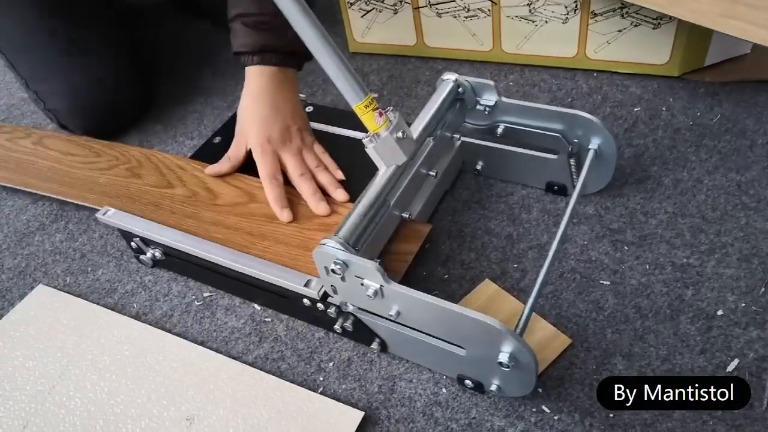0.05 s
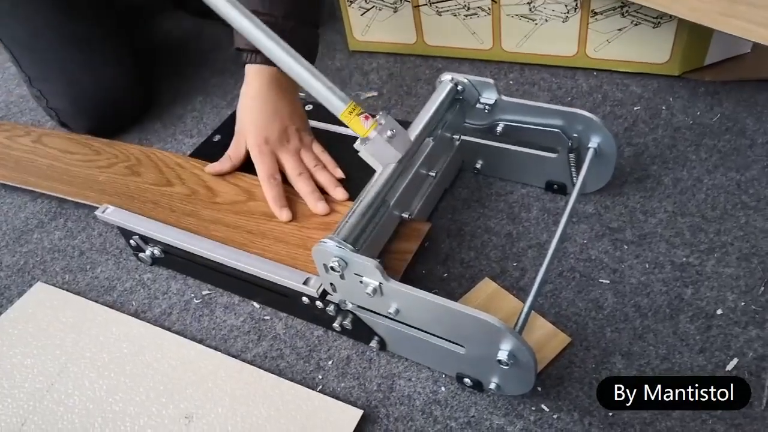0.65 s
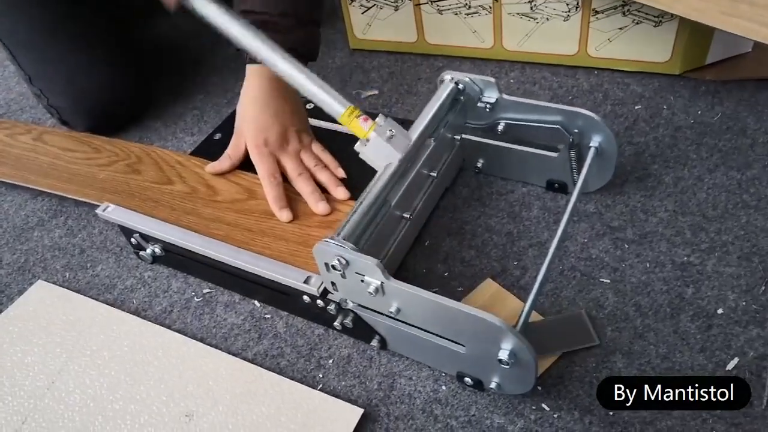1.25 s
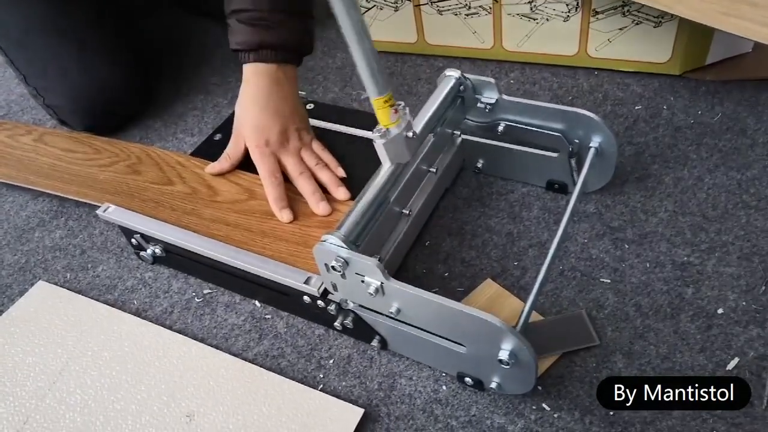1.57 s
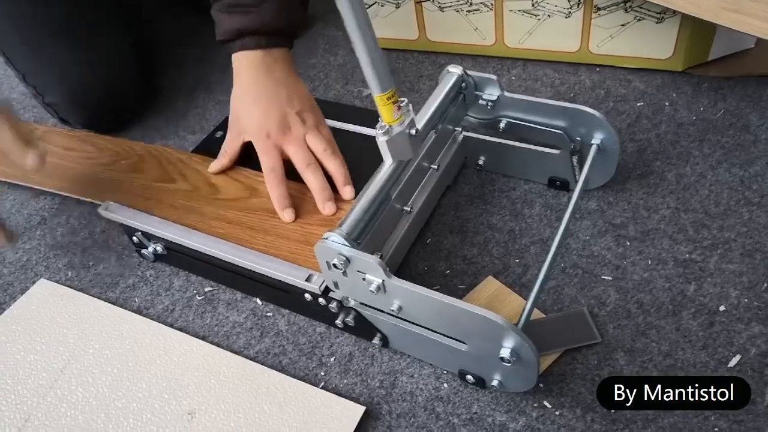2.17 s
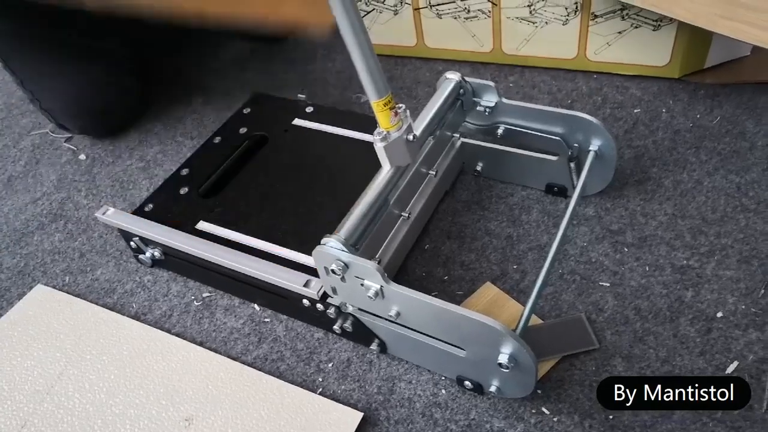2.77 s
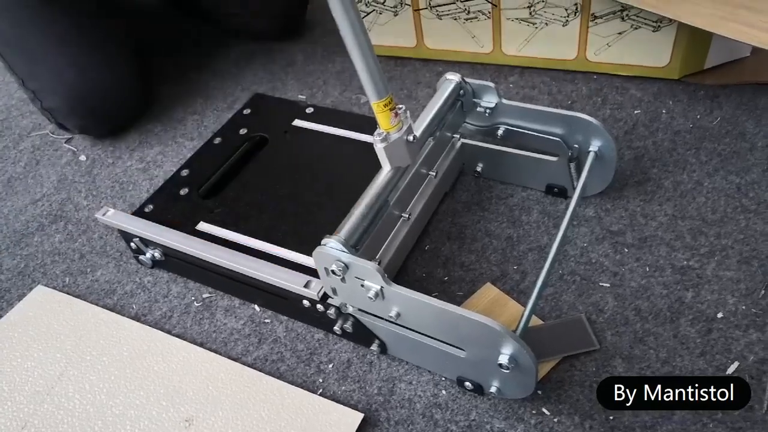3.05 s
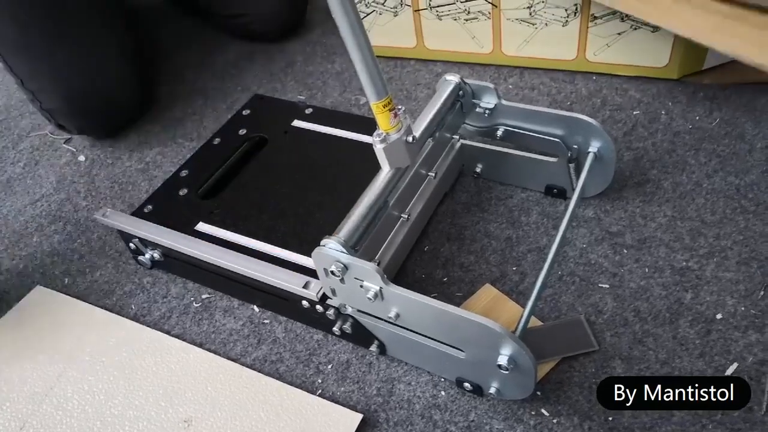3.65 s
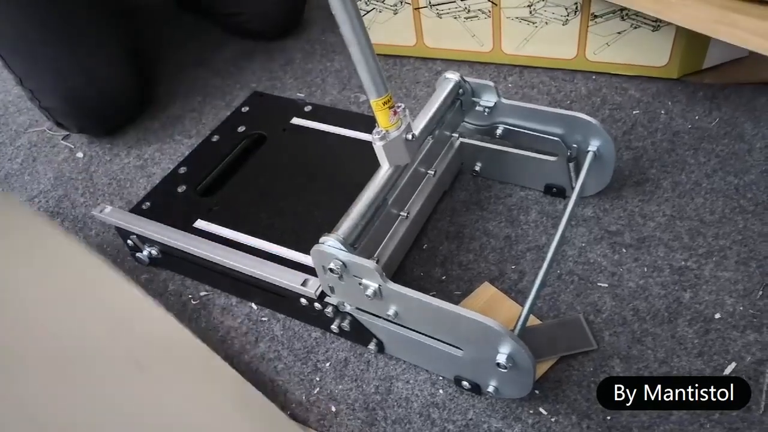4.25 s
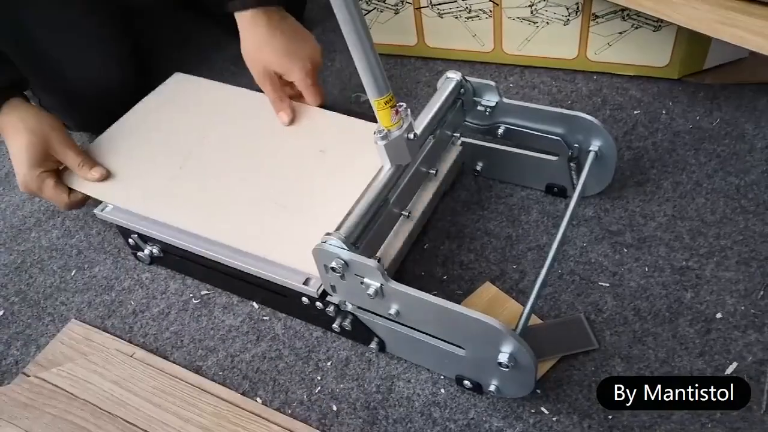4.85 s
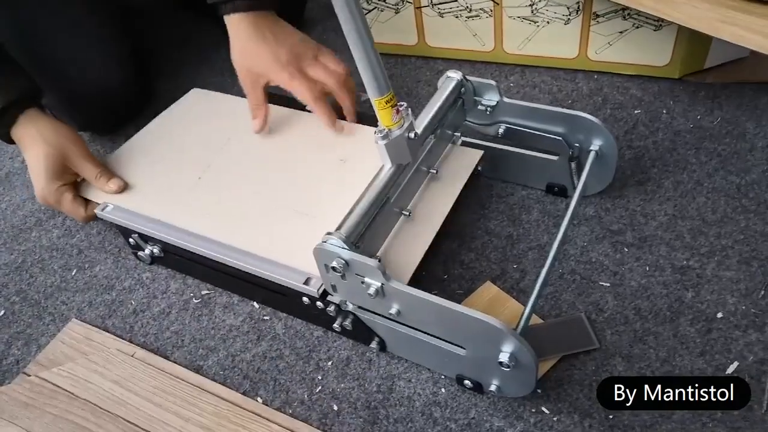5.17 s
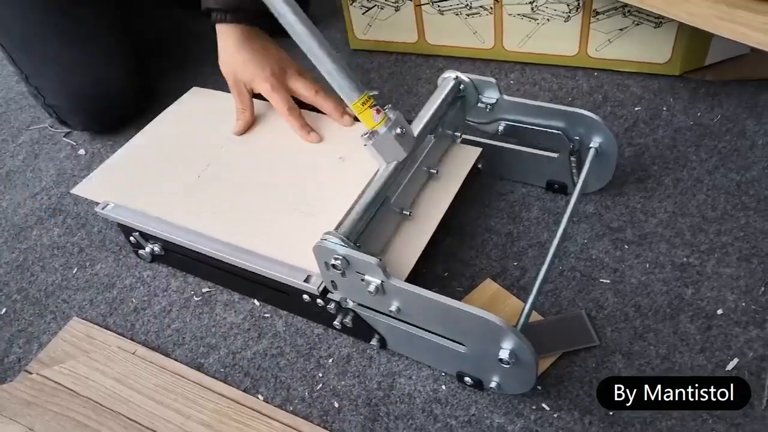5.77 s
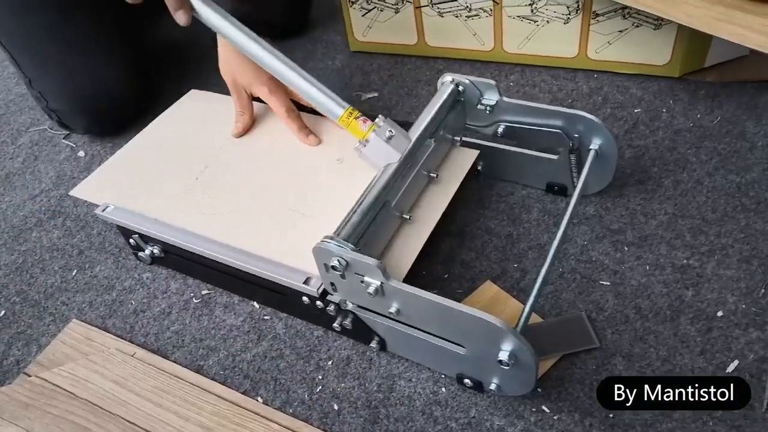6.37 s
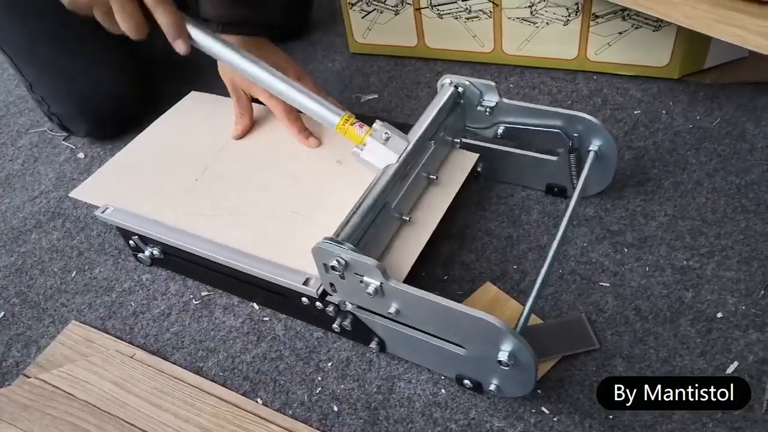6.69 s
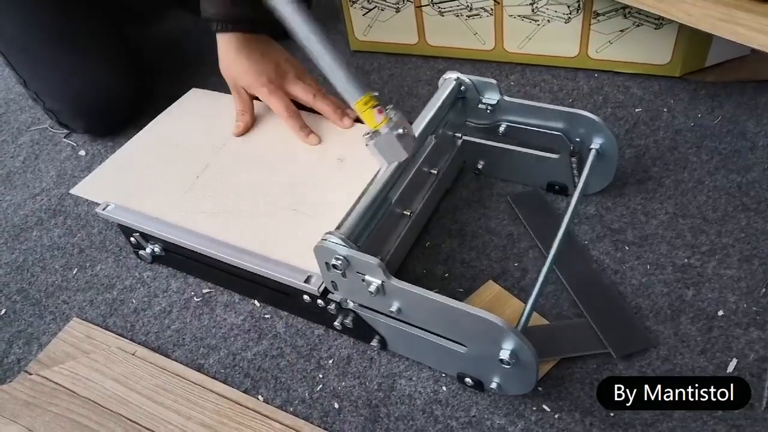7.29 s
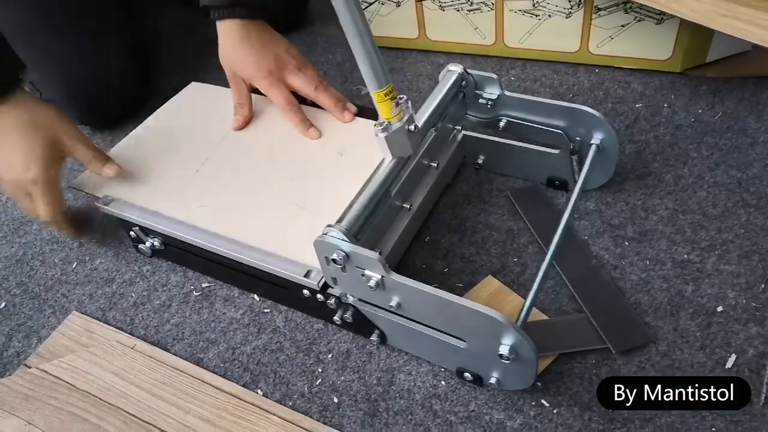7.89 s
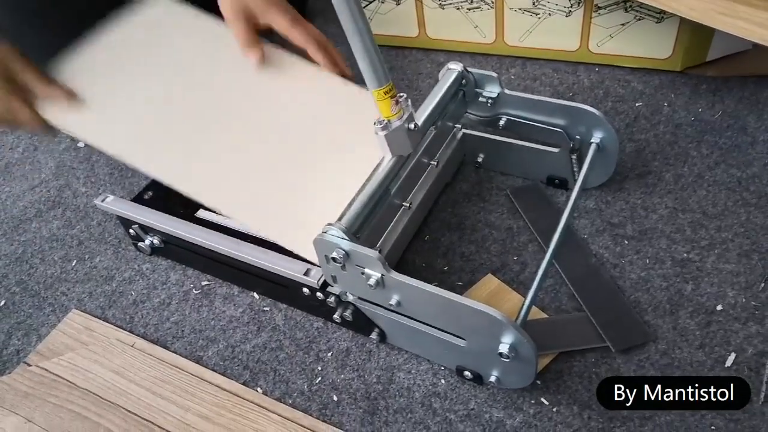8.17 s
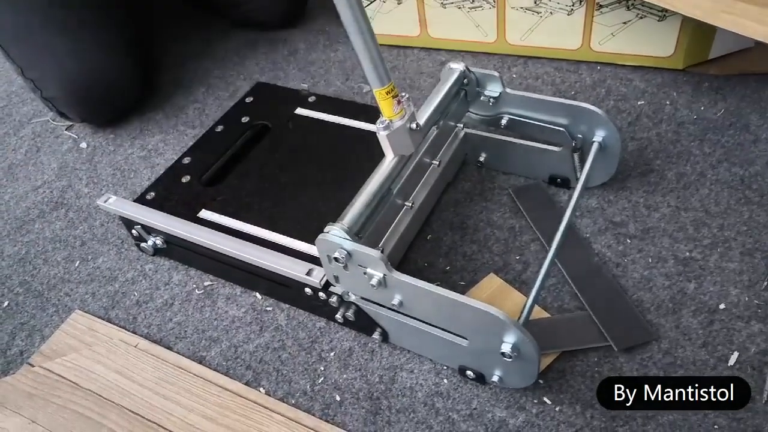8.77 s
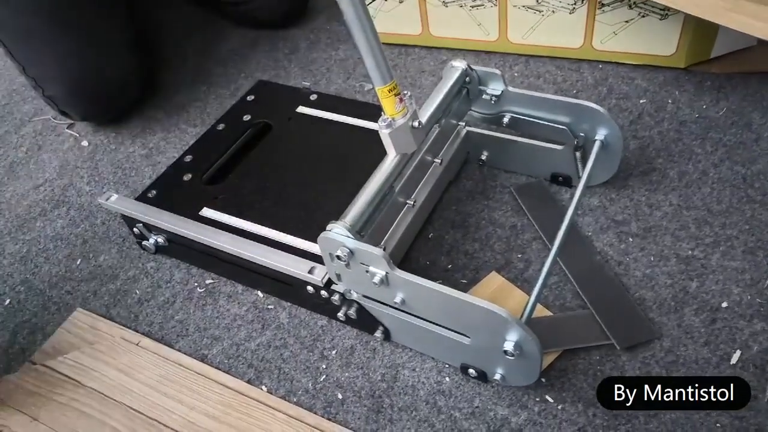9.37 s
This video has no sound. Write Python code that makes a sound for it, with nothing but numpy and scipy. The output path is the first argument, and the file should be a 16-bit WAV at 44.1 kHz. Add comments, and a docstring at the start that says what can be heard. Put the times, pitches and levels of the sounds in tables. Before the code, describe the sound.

A lever cutter shears two vinyl flooring planks with sharp snaps, scrapes and steel clanks, and each plank flops onto a pile.

```python
"""A lever cutter on a carpeted floor shears two vinyl planks in a bare, echoing room.
Each plank snaps under the blade, which scrapes the cut edge; the lever clanks against its
steel stop, rings the frame and squeaks as it rises. Cut planks flop on to a pile to the left,
and the next is knocked against the guide fence. Sleeves rustle over a low background rumble."""
import sys
import numpy as np
from scipy import signal
from scipy.fft import rfft, irfft, next_fast_len
from scipy.io import wavfile
from scipy.ndimage import uniform_filter1d, minimum_filter1d

SR = 44100
rng = np.random.default_rng(int(sys.argv[2]) if len(sys.argv) > 2 else 0)


def dump_mix(stems):
    """Bounce the given channels to the path in sys.argv[1] as a 16-bit WAV at rate SR."""
    frames = np.atleast_2d(stems).T  # one column per channel
    limited = np.clip(frames, -1, 1)  # hard clip at full scale
    pcm = np.round(limited * 32767).astype(np.int16)
    wavfile.write(sys.argv[1], SR, pcm)


N = 420273
TIME = np.arange(N) / SR


def amp(db):
    """Turn decibels into a multiplier."""
    return 10 ** (np.asarray(db) / 20)


def unit(x):
    """Scale a signal to an average power of 1."""
    return x / np.sqrt(np.mean(x ** 2))


def at_hz(points, hz):
    """Read between (frequency, value) points, with octaves evenly spaced."""
    frequencies, values = np.transpose(points)
    return np.interp(np.log(np.maximum(hz, 1)), np.log(frequencies), values)


def convolve(x, response):
    """Pass a stereo sound through an object, given the object's response to a click."""
    return signal.fftconvolve(x, np.atleast_2d(response), axes=1)[:, :N]


def body(colour, tilt_db=0, resonances=(), size=4096):
    """An object's response to a click: its colour (bass-to-treble balance) plus ringing peaks."""
    hz = np.fft.rfftfreq(size, 1 / SR)
    db = at_hz(colour, hz) + tilt_db * np.log2(np.maximum(hz, hz[8]))
    for centre, width, peak_db in resonances:
        db = db + peak_db / (1 + ((hz - centre) / width) ** 2)
    cepstrum = irfft(np.log(amp(db)))
    spectrum = np.exp(rfft(2 * cepstrum[:size // 2], size))  # rings after the click, never before
    return unit(irfft(spectrum)) / np.sqrt(size)


def stereo(x, alike_hz):
    """Two unrelated signals become left and right: alike below alike_hz, different above."""
    size = next_fast_len(x.shape[1])
    likeness = 1 / (1 + (np.fft.rfftfreq(size, 1 / SR) / alike_hz) ** 3)
    mid, side = rfft(x, size) * np.sqrt([(1 + likeness) / 2, (1 - likeness) / 2])
    return irfft([mid + side, mid - side], size)[:, :x.shape[1]]


def wander(rate_hz):
    """A random drift of typical size 1."""
    step = int(SR / rate_hz)
    stairs = np.repeat(rng.standard_normal(N // step + 1), step)[:N]
    return unit(uniform_filter1d(stairs, step))


def swell(time, db, rise, hold, fall):
    """A volume curve that reaches its level at the given time, holds, then dies away."""
    fade = np.maximum(time - TIME, 0) / rise + np.maximum(TIME - time - hold, 0) / fall
    return amp(db) * np.exp(-np.clip(fade, 0, 30))


def rub(gain, colour, grain_db, flutter_db):
    """Friction: countless small slips of uneven size, catching and easing."""
    sizes = amp(grain_db * np.minimum(rng.exponential(size=N // 32 + 1), 4))
    grains = rng.standard_normal((2, N)) * np.repeat(sizes, 32)[:N]
    slips = unit(grains * amp(flutter_db * wander(38)))
    return convolve(stereo(slips, 330) * gain, body(colour))


def contact(length, size=8192):
    """Two things meet: one sharp impact, then a dense cluster of tiny ones."""
    t = np.arange(size) / SR
    impact = 0.93 * np.exp(-(t / 0.002) ** 2)
    envelope = impact + np.exp(-(t / length) ** 2 / 2) + 0.33 * np.exp(-t / length / 2)
    spectrum = rfft(rng.standard_normal((2, size)) * envelope)
    flattened = spectrum / np.sqrt(uniform_filter1d(abs(spectrum) ** 2, size=15))
    return irfft(flattened) * np.sqrt(envelope)


def blow(colour, resonances, alike_hz, db, length, tilt_db, pan_db=0):
    """One contact sounds through the struck object at its own strength and brightness."""
    hit = convolve(stereo(contact(length), alike_hz), body(colour, tilt_db, resonances))
    hit = unit(hit) * np.sqrt(SR / 100 / hit.shape[1])  # as much energy as 10 ms at power 1
    return hit * amp([[db + pan_db / 2], [db - pan_db / 2]])


def blows(table, colour, resonances=(), *, alike_hz):
    """Play a table of hits on one object."""
    out = np.zeros((2, N))
    for time, *settings in table:
        hit = blow(colour, resonances, alike_hz, *settings)
        start = int(time * SR)
        out[:, start:start + hit.shape[1]] += hit[:, :N - start]
    return out


# The background's colour: (frequency [Hz], relative level [dB])
AIR_COLOUR = [(20, -10.5), (31, -9), (42, -5.5), (65, 3), (90, -5.5), (122, -2), (200, -7.5), (320, -13),
              (520, -21.5), (1000, -24), (2200, -31), (5000, -32.5), (10000, -34.5), (16000, -45)]


def room_air(level_db=-54.5):
    """Low rumble and faint hiss, swaying a little."""
    noise = convolve(stereo(rng.standard_normal((2, N)), 310), body(AIR_COLOUR, size=16384))
    return unit(noise) * amp(level_db + 0.5 * wander(3))


# The worker shifts about: (time [s], relative level [dB], length [s])
BODY_SHIFTS = [(0, -66, 2.35), (2.602, -63.5, 2.3), (5.596, -70, 1.6), (7.63, -65.5, 1.33)]
# An arm reaches out: (time [s], relative level [dB], rise [s], fall [s])
ARM_REACHES = [(.07, -61.5, .15, 0.15), (.45, -65.5, 0.076, 0.66), (2.03, -65.5, 0.22, 0.19),
               (3.15, -59.5, 0.27, 0.24), (4.11, -57, .006, 0.048), (4.269, -64.5, 0.023, 0.14),
               (5.81, -62, .008, 0.1), (6.03, -60.5, 0.036, 0.16), (7.86, -67, 0.1, 0.13),
               (8.96, -64.5, 0.18, .04)]
# The colour of rubbing cloth: (frequency [Hz], relative level [dB])
CLOTH_COLOUR = [(150, -4), (500, 5), (1000, 3.5), (2000, 0.5), (4200, 0.5), (6500, -1.5), (9000, -2.5),
                (12000, -11.5), (16000, -16.5)]


def clothes_rustle(rise_s=0.074, fall_s=0.18):
    """Cloth rubs faintly while the body moves, and a sleeve swishes with each reach."""
    shifting = sum(swell(time, db, rise_s, length, fall_s) for time, db, length in BODY_SHIFTS)
    reaching = sum(swell(time, db, rise, 0, fall) for time, db, rise, fall in ARM_REACHES)
    return rub(np.hypot(shifting, reaching), CLOTH_COLOUR, grain_db=0.9, flutter_db=0.3)


# The lever brushes its guides: (time [s], relative level [dB], length [s])
GRAZES = [(0.012, -66.5, 0.11), (0.595, -69.5, 0.47), (5.844, -76, .2)]
# The colour of steel on steel, also used for the clanks: (frequency [Hz], relative level [dB])
STEEL_COLOUR = [(100, -29.5), (230, -24), (450, -7.5), (700, -9), (980, -6), (1400, -4.5), (2200, -11.5),
                (3000, -4.5), (3700, -4), (4500, -2), (6000, -3), (8500, -6), (12000, -14), (16000, -36)]


def lever_grazes(ramp_s=0.025):
    """Steel slides lightly on steel while the lever is lowered."""
    gain = sum(swell(time, db, ramp_s, length, ramp_s) for time, db, length in GRAZES)
    return rub(gain, STEEL_COLOUR, grain_db=2.0, flutter_db=1.0)


# The frame's ringing notes: (frequency [Hz], relative level [dB], time to fade by 60 dB [s])
FRAME_NOTES = [(495, -4, .7), (826, -5.5, 1), (939, -3.5, .65), (1240, -5, 0.45), (2008, -9.5, 0.76),
               (2780, -7.5, .6), (3020, -8.5, 0.46), (3300, -9.5, .4), (3460, -8.5, 0.54), (4076, -8.5, .7),
               (4230, -9, .7), (4440, -7.5, 0.98), (4630, -5.5, 1), (4980, -6, .65), (4960, -3, 0.8),
               (5130, -7, .6), (5400, -10.5, .49), (6650, -5, .5), (6940, -2.5, .43), (7250, -3, .45),
               (7630, -4, 0.49), (8123, -4.5, .5)]


def frame_ring(force, looseness=2.2):
    """The steel frame rings when rubbed or hit; its loose joints jostle and roughen each note."""
    t = TIME[:SR]
    jostle = looseness * np.vstack([wander(30), wander(30)])
    ring = 0
    for hz, db, fade_s in FRAME_NOTES:
        start = rng.integers(N - SR)
        phase = 2 * np.pi * (hz * t + rng.random((2, 1))) + jostle[:, start:start + SR]
        ring = ring + amp(db - 60 * t / fade_s) * np.sin(phase)
    return convolve(force, unit(ring) / np.sqrt(SR))


# A plank is lined up:
# (time [s], level [dB], contact length [s], brightness [dB/octave], left minus right [dB])
KNOCKS = [(.3946, -55, .014, 4, -4), (4.768, -42, 0.016, -1, 0.5), (4.9278, -54.5, 0.0032, 2.5, 2),
          (4.9637, -57, 0.0028, 0.5, 7), (5.034, -41.5, 0.0024, -4.5, 0.5),
          (5.106, -50, 0.0094, -4.5, -4.5), (8.2508, -23.5, 0.015, 2, 0.5), (8.4568, -48, .012, 5.5, 2)]
# A knock's colour: (frequency [Hz], relative level [dB])
KNOCK_COLOUR = [(120, -31), (300, -26), (480, -8), (650, -9.5), (900, -1.5), (1300, -2.5), (1650, 1),
                (2100, -4), (3400, -2.5), (4800, -10.5), (8500, -11.5), (16000, -29.5)]
# Where the guide fence rings: (frequency [Hz], width [Hz], boost [dB])
FENCE_PEAKS = [(945, 52, 9.5), (1215, 63, 5), (1578, 50, 5.5), (2587, 40, 7.5), (3200, 110, 3),
               (3455, 42, 10.5), (4480, 52, 5.5), (6340, 71, 3.5), (7260, 40, 8), (8640, 49, 4.5)]


def fence_knocks():
    """A plank's edge knocks against the fence, the rail that keeps it straight."""
    return blows(KNOCKS, KNOCK_COLOUR, FENCE_PEAKS, alike_hz=1576)


# A plank is pushed along: (time [s], relative level [dB], rise [s], fall [s])
SLIDES = [(.545, -54.5, .016, 0.055), (2.53, -53, 0.083, 0.11), (5.13, -48, 0.02, 0.046),
          (8.226, -48, 0.035, 0.09)]
# A slide's colour: (frequency [Hz], relative level [dB])
SLIDE_COLOUR = [(150, -1.5), (500, 7), (1000, -1.5), (2000, 0), (4200, -1), (6500, -2.5), (9000, -0.5),
                (12000, -6.5), (16000, -22)]


def plank_slides():
    """A plank rubs over the cutter's flat bed."""
    gain = sum(swell(time, db, rise, 0, fall) for time, db, rise, fall in SLIDES)
    return rub(gain, SLIDE_COLOUR, grain_db=-0.4, flutter_db=0.1)


# The load builds on the hinge, one row a cut: (time [s], level [dB], rise [s], hold [s])
STRAINS = [(0.935, -46, .011, .03), (6.77, -58.5, 0.07, 0.037)]


def hinge_strain(pitch_hz=708, fall_s=0.004, overtone_db=-7, full_load_db=-48):
    """The hinge sticks and slips in a thin note that brightens with load until the plank gives."""
    phase = 2 * np.pi * np.cumsum(pitch_hz * (1 + 0.01 * wander(90))) / SR
    gain = sum(swell(time, db, rise, hold, fall_s) for time, db, rise, hold in STRAINS)
    bite = np.sqrt(gain / amp(full_load_db))
    overtones = np.sin(2 * phase) + bite * np.sin(3 * phase)
    return gain * (np.sin(phase) + amp(overtone_db) * overtones)


# The plank breaks:
# (time [s], level [dB], contact length [s], brightness [dB/octave], left minus right [dB])
SNAPS = [(.9655, -39.5, .003, 6, -4), (.969, -11.5, 0.005, -0.6, 0), (6.800, -39, .002, 0.5, 6),
         (6.807, -35, 0.0052, -0.5, 4.5), (6.8255, -14, 0.0096, 0.5, 4.5)]
# A snap's colour: (frequency [Hz], relative level [dB])
SNAP_COLOUR = [(100, -43.5), (230, -23), (420, -4), (660, -13), (980, 4), (1350, 1), (1800, -3.5),
               (2600, -2), (3800, 0), (5500, -6), (9000, -8), (12000, -16), (16000, -29)]
# Where a plank held on the bed rings: (frequency [Hz], width [Hz], boost [dB])
HELD_PLANK_PEAKS = [(404, 19, 8), (452, 17, 3), (960, 52, 0)]


def plank_snaps():
    """The plank cracks under the blade, then snaps right through."""
    return blows(SNAPS, SNAP_COLOUR, HELD_PLANK_PEAKS, alike_hz=1455)


# The blade drags, one row a cut: (time [s], relative level [dB], length [s])
SCRAPES = [(1.02, -36, 0.6), (6.878, -34.5, 0.614)]
# A scrape's colour: (frequency [Hz], relative level [dB])
SCRAPE_COLOUR = [(150, -33.5), (280, -8.5), (430, -5), (650, -7), (1000, 3), (1800, -3.5), (3500, -5),
                 (6000, -9), (9000, -13), (15000, -38)]


def blade_scrape(rise_s=0.022, fall_s=0.025, ease_db_per_s=17):
    """The blade scrapes the cut edge, hardest just after the snap, easing as the edge wears clear."""
    gain = 0
    for time, db, length in SCRAPES:
        easing = amp(-ease_db_per_s * np.maximum(TIME - time, 0))
        gain = gain + swell(time, db, rise_s, length, fall_s) * easing
    return amp(2.5) * rub(gain, SCRAPE_COLOUR, grain_db=3.0, flutter_db=1.6)


# A plank bumps the bed: (time [s], level [dB], contact length [s], brightness [dB/octave])
BUMPS = [(1.02, -28, 0.059, 4.5), (1.11, -35, 0.024, -1), (1.25, -37, .036, -6), (1.365, -25, 0.088, 2),
         (2.450, -45.5, 0.022, -3.5), (2.515, -43, 0.069, -0.5), (4.788, -40, 0.016, -1),
         (4.7975, -43, 0.0056, -.5), (5.120, -47.5, .018, 1), (6.85, -30, 0.014, 11.5)]
# A bump's colour: (frequency [Hz], relative level [dB])
BUMP_COLOUR = [(150, -14), (330, -12.5), (490, 8), (700, -9.5), (1050, 3), (1550, -3.5), (2300, -6.5),
               (4000, -9), (9000, -15), (16000, -35.5)]


def plank_bumps():
    """A plank shudders on the cutter's bed, is lifted from it or settles on it."""
    return blows(BUMPS, BUMP_COLOUR, alike_hz=1182)


# Steel hits steel: (time [s], level [dB], contact length [s], brightness [dB/octave])
CLANKS = [(1.178, -34, 0.0059, -4), (1.2505, -33, 0.0019, 2.5), (1.3265, -23.5, .0038, 5.5),
          (1.3288, -6, .0031, 1.1), (7.1883, -10.5, .0027, -1.5), (2.1396, -50, 0.0099, -5),
          (7.010, -37, .0062, 1), (7.0525, -34, .0037, 2.5)]
# Where the bed and side plates briefly ring: (frequency [Hz], width [Hz], boost [dB])
PLATE_PEAKS = [(970, 30, 5), (1590, 68, 2), (2563, 67, 2.5), (3050, 160, 8.5), (3270, 76, 4.5),
               (3590, 120, 9), (3960, 80, 8), (4930, 140, 4.5), (6900, 200, 2.5), (8100, 180, 2)]


def lever_clanks():
    """The lever and blade holder tick in their guides and strike the steel frame."""
    return blows(CLANKS, STEEL_COLOUR, PLATE_PEAKS, alike_hz=3200)


# The rising lever squeaks: (time [s], level [dB], rise [s], hold [s], fall [s], pitch [Hz])
SQUEAKS = [(1.632, -36.5, 0.0015, 0.0026, 0.021, 975), (7.371, -30, .022, 0.042, 0.054, 856),
           (7.462, -29, .003, 0.0051, 0.0032, 902), (7.497, -42, 0.0086, 0.054, .008, 459)]


def pivot_squeaks(waver=0.014, octave_db=-15, judder_hz=33.5, judder_depth=0.67):
    """The pivot catches and slips as it turns, so its wavering note dips at every catch."""
    wavering_time = np.cumsum(1 + waver * wander(250)) / SR
    out = 0
    for time, db, rise, hold, fall, hz in SQUEAKS:
        phase = 2 * np.pi * hz * wavering_time
        tone = np.sin(phase) + amp(octave_db) * np.sin(2 * phase)
        judder = 1 - judder_depth * np.sin(np.pi * judder_hz * (TIME - time)) ** 2
        out = out + swell(time, db, rise, hold, fall) * judder * tone
    return out


# A plank hits the pile: (time [s], level [dB], contact length [s], brightness [dB/octave])
SLAPS = [(3.4735, -31.5, 0.042, 0.5), (3.596, -39, .0055, -1.5), (3.6055, -30, 0.0046, -1.9),
         (3.6841, -35, 0.0093, -3.5), (3.722, -24, 0.0046, 2), (9.0205, -30, 0.0079, 0),
         (9.112, -32, 0.014, 4), (9.1215, -28, 0.0038, -2.6), (9.131, -27, 0.011, -3),
         (9.3323, -40.5, 0.009, -2.5)]
# A slap's colour: (frequency [Hz], relative level [dB])
SLAP_COLOUR = [(200, -25.5), (1000, 1), (2000, 1.5), (3000, 4), (5000, 4), (8500, 7), (12000, -4.5),
               (16000, -18)]


def pile_slaps():
    """A dropped plank's hard face slaps the other boards."""
    return blows(SLAPS, SLAP_COLOUR, alike_hz=1420)


# A plank hits the floor: (time [s], level [dB], contact length [s], brightness [dB/octave])
THUDS = [(3.474, -19.5, 0.029, 3), (3.609, -22.5, 0.016, 2.5), (3.665, -31.5, 0.011, 3.5),
         (3.720, -28.5, .01, -1), (3.82, -31.5, 0.021, -6), (9.036, -25, 0.034, 4.5),
         (9.122, -26.5, 0.013, 1), (9.25, -33.5, 0.022, -9.5)]
# A thud's colour: (frequency [Hz], relative level [dB])
THUD_COLOUR = [(40, -6), (80, -5), (115, 2.5), (190, 3.5), (250, -1), (350, -3.5), (600, -13.5),
               (1100, -13), (2000, -26.5), (5000, -40.5), (15000, -55)]
# Where a loose plank and the floor ring: (frequency [Hz], width [Hz], boost [dB])
FLOOR_PEAKS = [(118.7, 11.7, 10.5), (201, 23, 6), (289.5, 54, 5), (372, 29, 2.5), (463, 54, 4),
               (748, 150, 4)]


def floor_thuds(bounce_delay_s=0.023, bounce_db=-6, bounce_stretch=2.66):
    """The limp plank flops on to the floor; a weaker, softer bounce follows each flop."""
    bounces = [(time + bounce_delay_s, db + bounce_db, length * bounce_stretch, tilt_db)
               for time, db, length, tilt_db in THUDS]
    return blows(THUDS + bounces, THUD_COLOUR, FLOOR_PEAKS, alike_hz=740)


# How long sound lingers in the room: (frequency [Hz], time to fade by 60 dB [s])
ROOM_FADE = [(100, 0.87), (260, 1.2), (500, 1.02), (900, 1.15), (2000, 0.9461), (5000, 0.81), (9000, 0.57),
             (15000, 0.33)]
# First echoes off walls and ceiling: (delay [s], relative level [dB])
WALL_ECHOES = [(0.0189, -10.5), (0.022, -15.5), (.038, -16), (.044, -13.5)]
# The small room favours the low middle: (frequency [Hz], relative level [dB])
ROOM_COLOUR = [(60, 1.5), (130, -2.5), (260, 2), (430, 7), (700, 3), (1100, -2.5), (2000, 1), (4000, -2),
               (8000, -0.5), (15000, 5)]


def room_echo(sound):
    """The walls send back a few clear echoes and a smooth tail whose treble dies first."""
    t = TIME[:SR * 3 // 2]
    hz = np.fft.rfftfreq(len(t), 1 / SR)
    noise = rfft(stereo(rng.standard_normal((2, len(t))), 340))
    centres = np.geomspace(80, 16000, 12)
    tail = 0
    for centre, band in zip(centres, np.eye(len(centres))):
        share = at_hz(np.column_stack([centres, band]), hz)
        tail = tail + irfft(noise * share, len(t)) * amp(-60 * t / at_hz(ROOM_FADE, centre))
    tail = unit(tail * (1 - np.exp(-t / 0.0028))) / np.sqrt(len(t))
    for delay, db in WALL_ECHOES:
        arrivals = (delay * SR + rng.integers(0, 60, 2)).astype(int)  # left and right
        tail[[0, 1], arrivals] += amp(db)
    return convolve(convolve(sound, tail), body(ROOM_COLOUR))


# Stereo balance of the cutter, the pile and the room: (frequency [Hz], left minus right [dB])
CUTTER_BALANCE = [(200, 0), (400, -4), (1000, -9), (2000, 3.5), (4000, -1), (8000, -12.5), (14000, -2.5)]
PILE_BALANCE = [(200, 1), (500, 10), (2000, 2), (4000, 11), (8000, -2.5), (14000, -3)]
ROOM_BALANCE = [(200, -1), (500, 3), (2000, 2.5), (4000, 3), (8000, 1), (14000, -2)]


def place(sound, balance, left_lead_s=0):
    """Give a sound a direction: one side is shaded, and one can hear it sooner."""
    size = next_fast_len(N + SR // 10)
    hz = np.fft.rfftfreq(size, 1 / SR)
    left = amp(at_hz(balance, hz) / 2) * np.exp(1j * np.pi * hz * left_lead_s)
    return irfft(rfft(sound, size) * np.array([left, 1 / left]), size)[:, :N]


def scene():
    """The cutter in front and the plank pile to the left, each with its share of the room."""
    snaps = plank_snaps()
    clanks = lever_clanks()
    knocks = fence_knocks()
    bumps = plank_bumps()
    thuds = floor_thuds()
    slaps = pile_slaps()
    ring = frame_ring(amp(-16.5) * snaps + amp(-17) * clanks + amp(-18.5) * knocks + lever_grazes())
    scrape = blade_scrape()
    handling = amp(4) * (clothes_rustle() + plank_slides())
    squeaks = pivot_squeaks() + hinge_strain()
    echo = room_echo(amp(-3) * snaps + amp(-8) * clanks + amp(-3) * knocks + amp(-15.5) * bumps
                     + amp(-5.5) * thuds + amp(1.5) * slaps + amp(-4.5) * scrape + amp(-13.5) * squeaks)
    cutter = place(snaps + clanks + knocks + bumps + squeaks, CUTTER_BALANCE, left_lead_s=-0.000069)
    pile = place(thuds + slaps, PILE_BALANCE, left_lead_s=0.000499)
    all_around = place(echo + ring + scrape + handling, ROOM_BALANCE)
    return cutter + pile + all_around + room_air()


def record(dry, ceiling=1.3, top_hz=15900):
    """Turn the hardest peaks down briefly, clip what still sticks out and cut the highest treble."""
    allowed_gain = 1 / np.maximum(abs(dry).max(axis=0) / ceiling, 1)
    gain = uniform_filter1d(minimum_filter1d(allowed_gain, size=131), size=131)  # about 3 ms
    treble_cut = signal.ellip(8, 0.2, 70, top_hz, fs=SR, output="sos")
    return signal.sosfilt(treble_cut, np.clip(dry * gain, -0.9, 0.9))


dry = scene()
out = record(dry)
dump_mix(out)
```